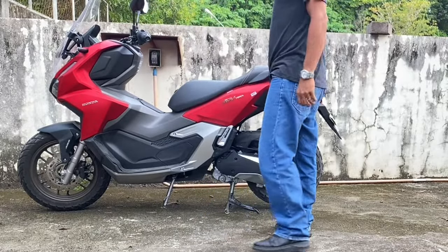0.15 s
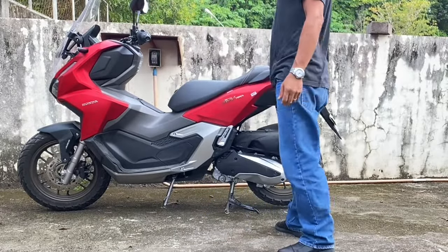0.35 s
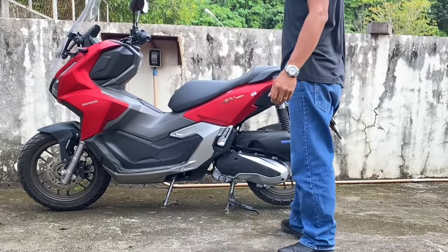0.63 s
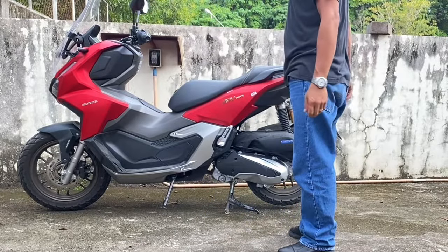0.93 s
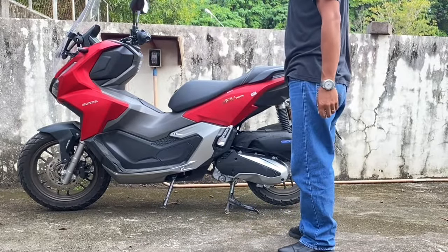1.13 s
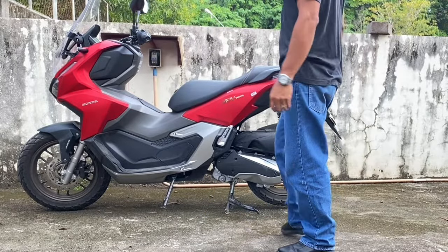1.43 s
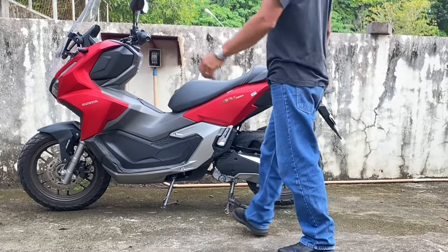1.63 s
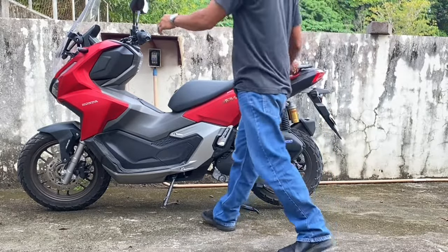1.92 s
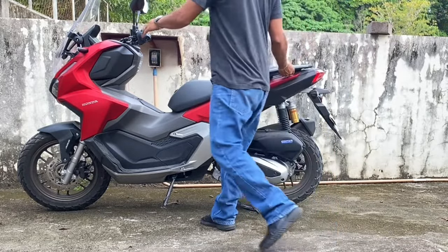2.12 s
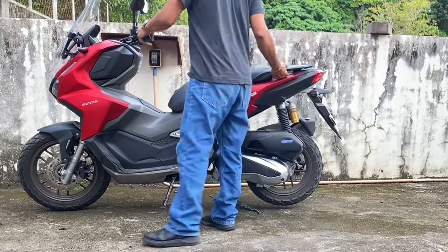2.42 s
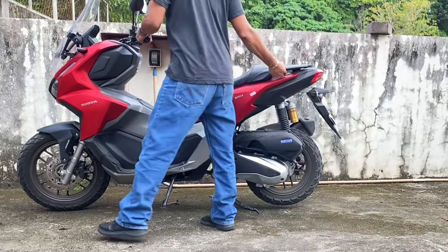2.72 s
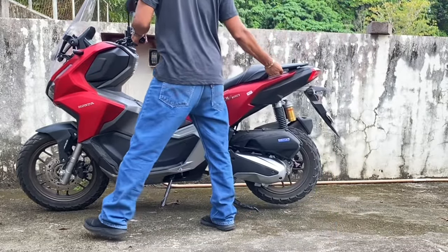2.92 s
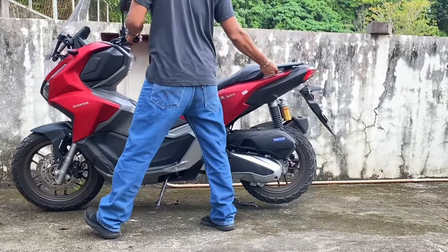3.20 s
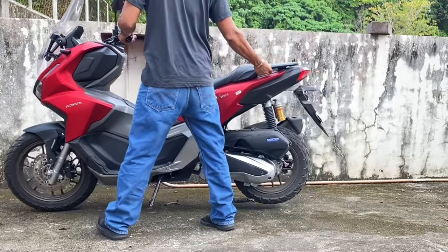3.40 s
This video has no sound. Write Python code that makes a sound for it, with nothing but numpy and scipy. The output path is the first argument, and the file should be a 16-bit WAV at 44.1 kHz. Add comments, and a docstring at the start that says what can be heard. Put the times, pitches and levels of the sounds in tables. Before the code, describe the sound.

Scuffing footsteps on gritty concrete, three short bursts with soft thumps and sand cracks, then fainter scrapes with tiny metal jingles, in a walled yard over low traffic rumble, miked from a few metres.

```python
"""Handling a scooter in a walled yard

Someone steps round a parked scooter on gritty concrete and takes hold of it. Shaped noise makes
the scuffing soles and brushing clothes; clicks make the cracking sand, and set off the ringing
knocks, thumps and jingling metal. Echoes and a short tail place these in the yard. Behind are
far traffic and a band of insects, both made of noise, and a low engine hum made of one wavering tone."""
import sys
import numpy as np
from scipy import signal
from scipy.fft import rfft, irfft, next_fast_len
from scipy.io import wavfile

SR = 44100
rng = np.random.default_rng(int(sys.argv[2]) if len(sys.argv) > 2 else 0)


def digitize_waveform(pressure):
    """Quantize a signal to 16-bit integers and store it at the path in sys.argv[1].

    Rows of a 2-D input are taken as channels; values are limited to [-1, 1].
    """
    field = np.atleast_2d(pressure).T
    bounded = np.clip(field, -1, 1)
    quanta = np.round(bounded * 32767).astype(np.int16)
    wavfile.write(sys.argv[1], SR, quanta)


N = 156555
T = np.arange(N) / SR  # time of every sample, in seconds

# Balance of bass and treble in the traffic: pitch_hz, level_db (per Hz)
TRAFFIC_COLOUR = [(20, -48), (31, -38), (39, -14.5), (48, -6), (60, -0.5), (88, -0.5), (110, -4.5),
                  (150, -8), (200, -17.5), (290, -21.5), (450, -27), (720, -30.5), (950, -30.5),
                  (1350, -35), (2050, -36.5), (3000, -41.5), (3800, -41.5), (5200, -46), (7200, -48),
                  (10000, -51.5), (14000, -52.5), (15800, -69)]
# Slow swell of the low traffic rumble: time_s, level_db
RUMBLE_SWELL = [(0, 2), (.5, -2), (1.05, 2), (1.3, 0), (1.65, -1.5), (2.0, 1), (2.6, -2), (3.0, -0.5),
                (3.55, -4)]
# Loudness of the engine hum: time_s, level_db
HUM_LEVEL = [(0, -52), (1.2, -45), (2.0, -49), (2.8, -38), (3.55, -40)]
# Balance of bass and treble in the insects: pitch_hz, level_db (per Hz)
INSECT_COLOUR = [(6800, -39), (7500, -12.5), (7900, 0), (8250, -2), (8600, -6), (9100, -3.5), (9550, -18.5),
                 (10500, -27)]
TRAFFIC_DB, RUMBLE_SWING_DB = -38, 1.53
HUM_HZ, HUM_WANDER_HZ = 62.47, 1.09
INSECTS_DB, INSECTS_SWING_DB = -68, 1.0

# Reflections off ground, scooter and wall: delay_s, level_db (against the direct sound)
YARD_ECHOES = [(.0021, -23.5), (.0052, -21), (.0135, -17.5), (.021, -12.5)]
YARD_T60_S, YARD_DB, YARD_DULL_HZ = 0.27, -14, 5970  # t60: time to fade by 60 dB

# Levels of the close sounds below are those before the yard is added.
# Light brushes of cloth and loose sand: start_s, rise_s, hold_s, fade_t60_s, level_db
CLOTH_BRUSHES = [(1.803, .004, .02, 0.22, -63), (1.855, .03, .11, .3, -68), (1.933, .001, .001, .025, -58),
                 (1.956, .001, .001, .03, -56), (1.969, .002, .002, .04, -68),
                 (1.999, .002, .003, .05, -61), (2.22, 0.071, .02, .25, -63),
                 (2.88, .004, .004, 0.091, -54.5), (3.291, .001, .002, .06, -56)]
# Balance of bass and treble in the brushes: pitch_hz, level_db (per Hz)
BRUSH_COLOUR = [(2000, -30), (6000, -8), (8500, -13), (10800, -10), (12400, -7), (13500, -3), (14600, -7),
                (15800, -20)]
# Touches that make the metal fittings jingle: time_s, level_db
JINGLE_TOUCHES = [(2.886, -53), (3.305, -47.5), (3.311, -58), (3.429, -51.5), (3.441, -49), (3.464, -49),
                  (3.517, -64), (3.533, -57), (3.538, -47)]
# Ringing tones of the fittings: pitch_hz, level_db, fade_t60_s
FITTING_TONES = [(6420, -9, 0.083), (8100, -11, 0.064), (8800, -16, .06), (9220, -9, 0.069),
                 (10870, -10, 0.054), (12200, -11, 0.055), (12800, -12, 0.052), (13600, -2.5, 0.067),
                 (14100, -11, 0.064)]
JINGLE_SPREAD_DB = 5

# Single grains cracking underfoot: time_s, peak_db
GRAIN_CRACKS = [(.2525, -22), (.2585, -26), (.2625, -34), (.772, -33), (.7775, -24.5), (2.3555, -26.5),
                (2.369, -23.5), (2.3955, -39), (3.352, -40)]
# Balance of bass and treble in a crack: pitch_hz, level_db (per Hz)
CRACK_COLOUR = [(300, -11), (1200, -2.5), (3600, -6), (6000, -17), (8000, -9), (13500, -19), (16000, -20)]
# Heel and sole landing: time_s, peak_db, pitch_hz, fade_t60_s
SHOE_KNOCKS = [(.567, -35, 520, 0.032), (.730, -35, 360, 0.11), (.735, -35, 540, 0.032),
               (.7425, -27, 745, 0.015), (0.76, -28.5, 480, 0.026), (0.775, -37, 1240, 0.023),
               (2.3638, -37.5, 442, 0.092), (3.351, -40.5, 800, 0.034)]
# Ring of the shoe: pitch_ratio (multiple of the knock's pitch), level_db, share of its fade_t60
SHOE_TONES = [(1, -0.5, 1), (1.3, -17.5, .5), (2.4, -22, 0.27)]
# Weight coming down softly: time_s, peak_db, pitch_hz, fade_t60_s
WEIGHT_THUMPS = [(0.251, -36, 60, .14), (0.639, -24, 78.4, 0.17), (2.338, -23, 68, 0.19),
                 (2.420, -35.5, 233, 0.037), (3.359, -40, 229, 0.093), (3.518, -35.5, 215, 0.13)]

# Soles scuffing: start_s, rise_s, hold_s, fade_t60_s, sole_db, scrape_db, rasp_hz, sand_db
SOLE_SCUFFS = [(.219, 0.0096, 0.017, .08, -46, -47, 3000, -46.5),
               (.250, 0.0027, .013, 0.068, -45, -41, 3940, -48),
               (0.713, 0.014, 0.036, 0.074, -43.5, -52, 2870, -54.5),
               (0.762, 0.011, 0.0045, 0.098, -46, -46.5, 3560, -40),
               (2.353, 0.0031, 0.008, 0.04, -43.5, -38, 2840, -46),
               (2.381, 0.012, 0.0072, 0.04, -43, -45.5, 2050, -45.5),
               (3.302, .003, .007, 0.17, -66, -54.5, 2100, -52),
               (3.344, 0.0045, 0.0053, 0.13, -46.5, -54, 3400, -49),
               (3.355, .004, .016, .16, -51, -57, 4030, -63),
               (3.415, 0.018, 0.036, .16, -71, -62.5, 2980, -52.5),
               (3.493, .006, 0.015, 0.12, -51, -59.5, 3480, -62),
               (3.526, .008, .014, .10, -53, -65, 2600, -48.5)]
# Balance of bass and treble in the shaking sole: pitch_hz, level_db (per Hz)
SOLE_COLOUR = [(120, -27.5), (250, -7), (370, 2.5), (600, -2), (800, -3), (1000, -5.5), (1220, -7),
               (1500, -12.5), (3000, -18)]
# Balance of bass and treble in the concrete scrape: pitch_hz, level_db (per Hz)
SCRAPE_COLOUR = [(700, -11), (1400, -6), (2100, -1), (2500, -2), (3500, -1), (4600, -4), (6000, -2),
                 (7300, -16), (11000, -6.5)]
# Balance of bass and treble in the rolling sand: pitch_hz, level_db (per Hz)
SAND_COLOUR = [(2500, -2.5), (5500, -4), (7400, -8.5), (8600, -7), (10500, -4), (12000, -4), (13400, 4.5),
               (14600, -10.5), (15800, -1)]
# Resonances that the scraping excites: pitch_hz, width_hz, level_db
SCRAPE_RESONANCES = [(1860, 38, 5.5), (2125, 41, -2), (2486, 50, 4), (2985, 55, 1), (3520, 100, 0.5),
                     (3950, 64, -3), (6150, 120, 4)]
RASP_DB, RASP_WIDTH_HZ = -3.5, 670  # rasp level against the scrape
GRAINS_PER_S, GRAIN_SPREAD_DB, RUB_SHARE = 3000, 4, 0.31  # rub share is a share of the power

CUTOFF_HZ = 15650


def from_db(db):
    """Turn decibels into a gain."""
    return 10 ** (np.asarray(db) / 20)


def rms_one(x):
    """Scale a sound so that its average (rms) level is one."""
    return x / np.sqrt(np.mean(x ** 2) + 1e-20)


def colour(x, spectrum):
    """Filter a sound to follow a table of pitch_hz, level_db, without smearing it back in time."""
    size = 2 * next_fast_len(len(x))
    table_hz, table_db = np.transpose(spectrum)
    hz = np.maximum(np.fft.rfftfreq(size, 1 / SR), 1)
    level_db = np.interp(np.log(hz), np.log(table_hz), table_db)
    # Folding the cepstrum (spectrum of the log gain) makes the filter act only forward in time
    cepstrum = irfft(np.log(from_db(level_db)))
    cepstrum[1:size // 2] *= 2
    cepstrum[size // 2 + 1:] = 0
    response = np.exp(rfft(cepstrum))
    return irfft(rfft(x, size) * response)[:len(x)]


def noise(spectrum):
    """Make steady coloured noise of rms one; the first second lets the filter settle."""
    return rms_one(colour(rng.standard_normal(N + SR), spectrum)[SR:])


def drift(rate_hz):
    """Make a random wander of unit spread that is weak above the given rate."""
    hz = np.fft.rfftfreq(N, 1 / SR)
    smoothing = (hz > 0) / (1 + (hz / rate_hz) ** 2) ** 2
    return rms_one(irfft(rfft(rng.standard_normal(N)) * smoothing, N))


def clicks(rows):
    """Put one single-sample click at each time_s, level_db."""
    out = np.zeros(N)
    for time_s, level_db in rows:
        out[min(int(time_s * SR), N - 1)] += from_db(level_db)
    return out


def ring(x, hz, t60):
    """Let clicks strike one fading tone; a unit click rings at about height one."""
    radius = from_db(-60 / (t60 * SR))  # fade per sample
    angle = 2 * np.pi * hz / SR
    return signal.lfilter([0, np.sin(angle)], [1, -2 * radius * np.cos(angle), radius ** 2], x + 1e-18)


def resonance(x, hz, width_hz):
    """Keep a narrow band of a sound, with gain one at its centre."""
    return signal.lfilter(*signal.iirpeak(hz, hz / width_hz, fs=SR), x)


def stroke(start, rise, hold, t60):
    """Shape the loudness of one rubbing contact: rise, hold, fade."""
    fade = np.maximum(T - start - rise - hold, 0) / t60
    return np.clip((T - start) / rise, 0, 1) * np.exp(-np.log(1000) * fade)


def friction(spectrum):
    """Mix many tiny slips of uneven size with smooth rubbing noise, to rms one."""
    sizes_db = GRAIN_SPREAD_DB * np.minimum(rng.exponential(1, N), 5)
    sizes = from_db(sizes_db) * rng.choice([-1, 1], N)
    slips = rms_one(sizes * (rng.random(N) < GRAINS_PER_S / SR))
    rubbing = rng.standard_normal(N)
    mix = np.sqrt(1 - RUB_SHARE) * slips + np.sqrt(RUB_SHARE) * rubbing
    return rms_one(colour(mix, spectrum))


def far_traffic():
    """Blend far traffic into one coloured noise whose low rumble swells and wanders."""
    traffic = from_db(TRAFFIC_DB) * noise(TRAFFIC_COLOUR)
    rumble = signal.sosfilt(signal.butter(1, 180, fs=SR, output="sos"), traffic)
    swell_db = np.interp(T, *np.transpose(RUMBLE_SWELL)) + RUMBLE_SWING_DB * drift(2.8)
    return traffic + rumble * (from_db(swell_db) - 1)


def engine_hum():
    """Hum like an idling engine: one low sine tone with a wandering pitch."""
    turns = np.cumsum(HUM_HZ + HUM_WANDER_HZ * drift(2.6)) / SR
    level = from_db(np.interp(T, *np.transpose(HUM_LEVEL)))
    return level * np.sqrt(2) * np.sin(2 * np.pi * turns)  # root 2 makes the level rms


def insects():
    """Blend the insects into a thin band of high noise with a quick flutter in level."""
    return from_db(INSECTS_DB + INSECTS_SWING_DB * drift(25)) * noise(INSECT_COLOUR)


def background():
    """Add up the distant sounds, which get no yard echo."""
    return far_traffic() + engine_hum() + insects()


def yard(x):
    """Add a few close reflections and a short dull tail, as hard walls do."""
    t = T[:SR]
    dulling = signal.butter(1, YARD_DULL_HZ, fs=SR, output="sos")
    tail = signal.sosfilt(dulling, rng.standard_normal(SR))
    tail = tail * np.exp(-np.log(1000) * t / YARD_T60_S)
    tail = tail * np.minimum(t / 0.0097, 1)  # builds up over 9.7 ms
    tail = from_db(YARD_DB) * tail / np.linalg.norm(tail)
    response = signal.unit_impulse(SR) + clicks(YARD_ECHOES)[:SR] + tail
    return signal.fftconvolve(x, response / np.linalg.norm(response))[:N]


def brushes():
    """Rub cloth and loose sand into faint, very bright rustles and ticks."""
    loudness = sum(from_db(level_db) * stroke(start, rise, hold, t60)
                   for start, rise, hold, t60, level_db in CLOTH_BRUSHES)
    return friction(BRUSH_COLOUR) * loudness


def jingles():
    """Ring the metal fittings: each touch bounces once and strikes every tone unevenly."""
    touch_s, touch_db = np.transpose(JINGLE_TOUCHES)
    bounce_s = touch_s + rng.uniform(0.0015, 0.006, len(touch_s))
    times = np.concatenate([touch_s, bounce_s])
    levels_db = np.concatenate([touch_db, touch_db - 14])
    out = np.zeros(N)
    for k, (hz, tone_db, t60) in enumerate(FITTING_TONES):
        strikes_db = levels_db + tone_db + JINGLE_SPREAD_DB * rng.standard_normal(len(times))
        out += (-1) ** k * ring(clicks(zip(times, strikes_db)), hz, t60)  # every other tone flipped
    return out


def cracks():
    """Snap larger grains under the sole: filtered clicks, scaled to their listed peaks."""
    peak = np.abs(colour(signal.unit_impulse(SR), CRACK_COLOUR)).max()
    return colour(clicks(GRAIN_CRACKS), CRACK_COLOUR) / peak


def footfalls():
    """Strike the shoe into short hollow knocks, and let weight land as low fading thumps."""
    out = np.zeros(N)
    for time_s, peak_db, hz, t60 in SHOE_KNOCKS:
        for ratio, tone_db, share in SHOE_TONES:
            out += ring(clicks([(time_s, peak_db + tone_db)]), hz * ratio, t60 * share)
    for time_s, peak_db, hz, t60 in WEIGHT_THUMPS:
        out += ring(clicks([(time_s, peak_db)]), hz, t60)
    return out


def scuffs():
    """Rub the shoe on the ground: the sole shakes, concrete rasps at its own pitch, sand rolls."""
    sole, scrape, sand = friction(SOLE_COLOUR), friction(SCRAPE_COLOUR), friction(SAND_COLOUR)
    resonances = sum(from_db(level_db) * resonance(scrape, hz, width_hz)
                     for hz, width_hz, level_db in SCRAPE_RESONANCES)
    scrape = rms_one(scrape + resonances)
    out = np.zeros(N)
    for start, rise, hold, t60, sole_db, scrape_db, rasp_hz, sand_db in SOLE_SCUFFS:
        rasp = rms_one(resonance(scrape, rasp_hz, RASP_WIDTH_HZ))
        rasping = rms_one(scrape + from_db(RASP_DB) * rasp)
        contact = from_db(sole_db) * sole + from_db(scrape_db) * rasping + from_db(sand_db) * sand
        out += stroke(start, rise, hold, t60) * contact
    return out


def scene():
    """Place the footwork and handling in the yard, over the outdoor background."""
    close_sounds = brushes() + jingles() + cracks() + footfalls() + scuffs()
    return (background() + yard(close_sounds))[None]  # one channel


def record(dry):
    """Drop the deepest bass, as the microphone does, and cut the top."""
    x = signal.sosfilt(signal.butter(8, 38, "high", fs=SR, output="sos"), dry)
    return signal.sosfilt(signal.ellip(12, .1, 80, CUTOFF_HZ, fs=SR, output="sos"), x)


dry = scene()
out = record(dry)
digitize_waveform(out)
```